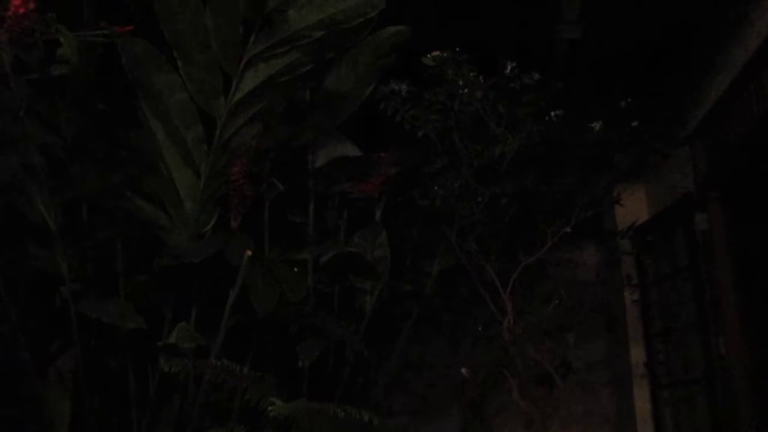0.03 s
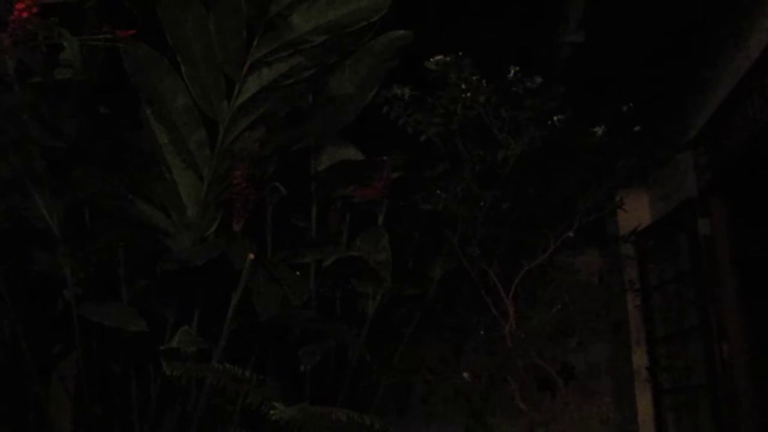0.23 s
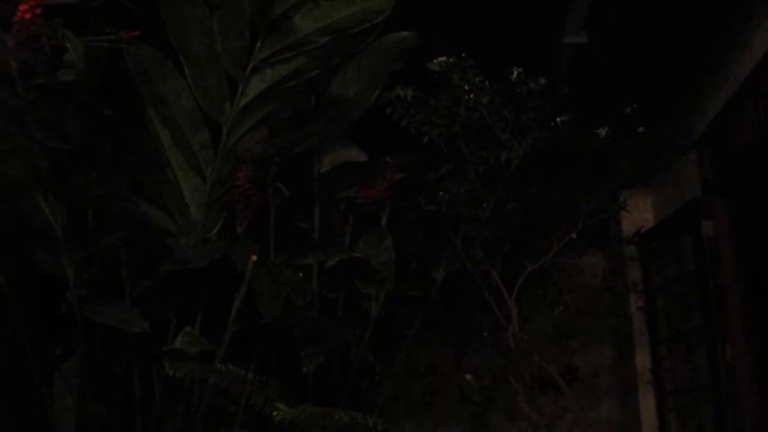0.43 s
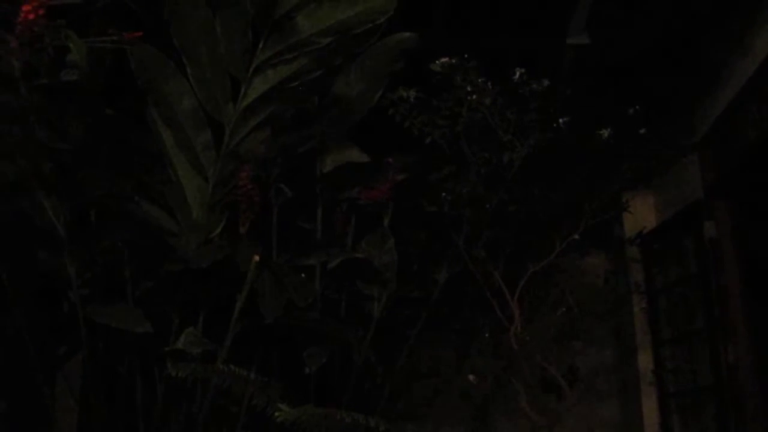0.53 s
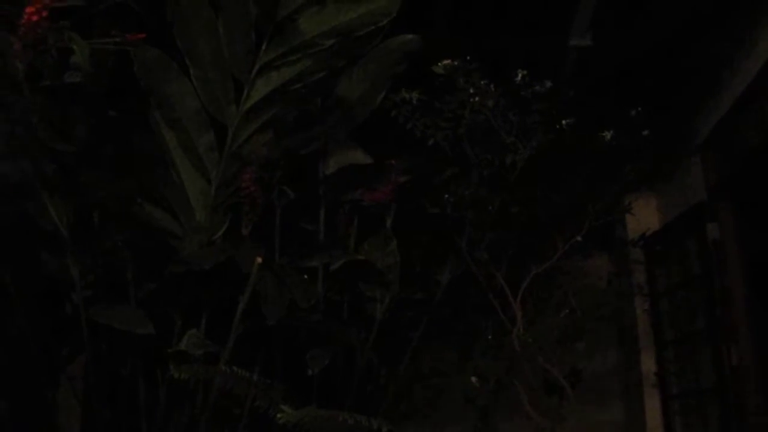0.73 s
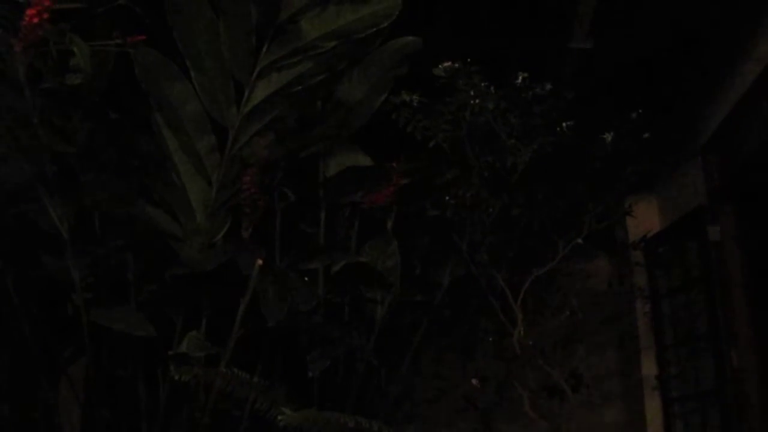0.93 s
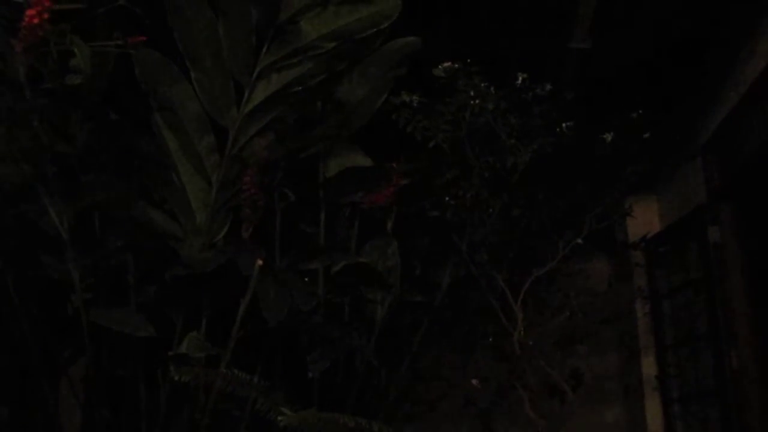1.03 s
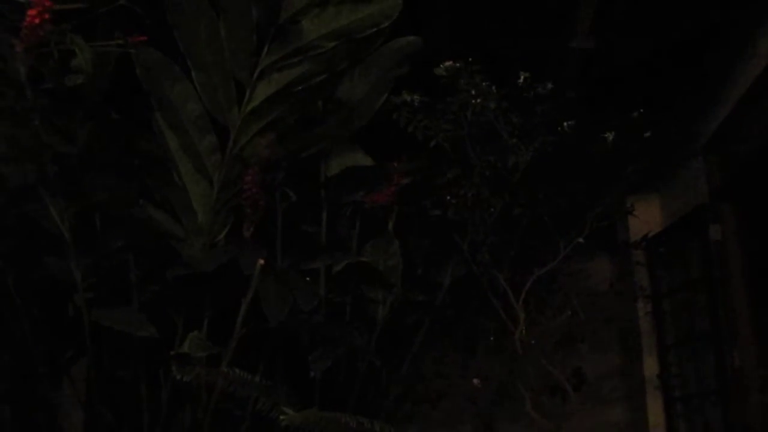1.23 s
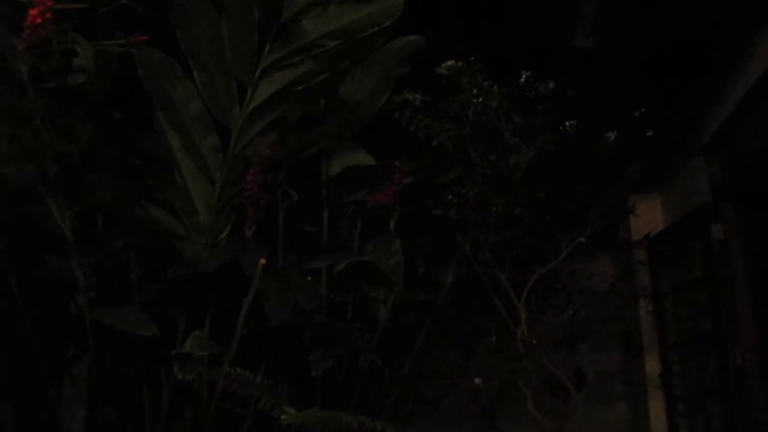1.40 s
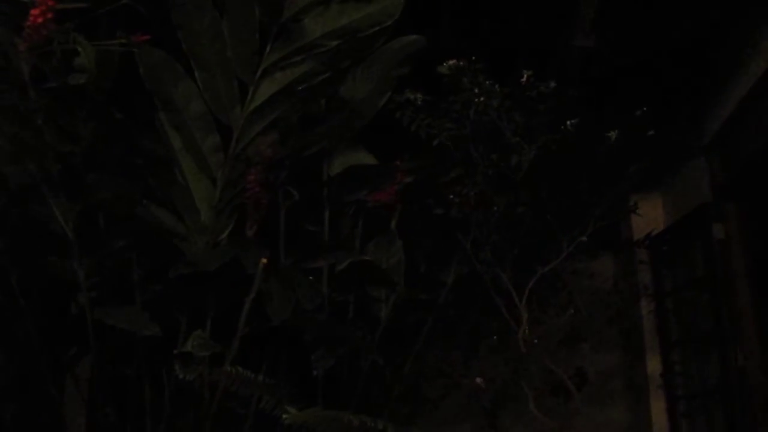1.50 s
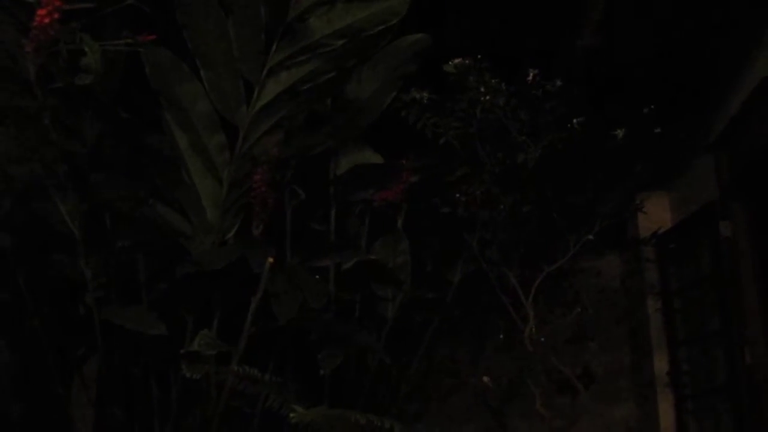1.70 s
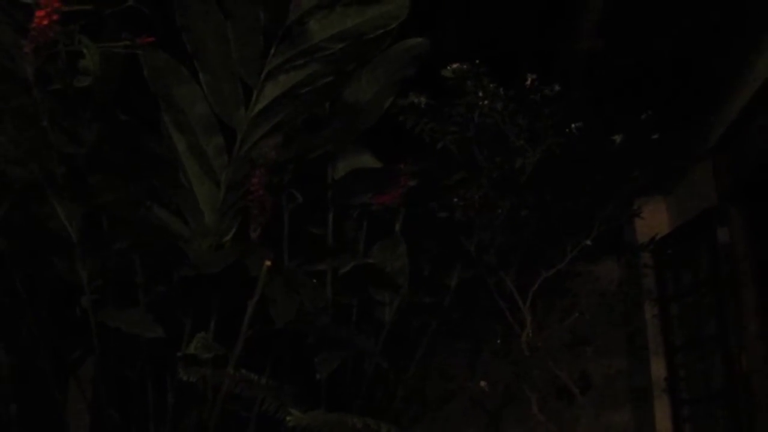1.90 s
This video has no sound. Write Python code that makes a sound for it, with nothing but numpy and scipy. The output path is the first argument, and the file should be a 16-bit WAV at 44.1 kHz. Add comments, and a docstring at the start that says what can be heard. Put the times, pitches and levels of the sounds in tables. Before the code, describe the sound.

A small tree frog close to the microphone calls twice, each time a short low note followed by a louder, higher whistle. The calls echo briefly around a night garden while distant insects hiss and trill steadily.

```python
"""Coqui frog in a night garden

Near the microphone a coqui calls twice: a low "co", then a whistled "qui" that slides up and holds.
Walls and foliage return echoes and a soft tail. Far off, insects hiss and trill over a faint outdoor
rumble, leaves tick, and the recorder's gain control ducks everything during each whistle."""
import sys
import numpy as np
from scipy import signal
from scipy.fft import rfft, irfft
from scipy.io import wavfile
from scipy.ndimage import uniform_filter1d

SR = 44100
rng = np.random.default_rng(int(sys.argv[2]) if len(sys.argv) > 2 else 0)


def inscribe(sig):
    """Save sig as 16-bit PCM at rate SR to the path in sys.argv[1].

    A 1-D sig is mono; a 2-D sig holds one channel per row.
    Samples are clipped to [-1, 1] before scaling.
    """
    pcm = np.round(np.clip(np.atleast_2d(sig).T, -1, 1) * 32767)
    wavfile.write(sys.argv[1], SR, pcm.astype(np.int16))


N = 85995
TIME = np.arange(N) / SR
CO_HZ, CO_S, NOTE_GAP_S = 1885.7, .083, .0022

# The frog, near the microphone:
# (start [s], co level [dB], qui level [dB], qui top pitch [Hz], qui length [s])
CALLS = [(.167, -19.4, -12.8, 3219.5, .211), (1.097, -19.6, -12.8, 3239.2, .173)]
def frog():
    """Each call is a co followed at once by a louder qui."""
    out = np.zeros(N)
    for start, co_db, qui_db, top_hz, length_s in CALLS:
        t = TIME - start
        out += from_db(co_db) * co(t)
        out += from_db(qui_db) * qui(t - CO_S - NOTE_GAP_S, top_hz, length_s)
    return np.sqrt(2) * out


def co(t, attack_s=.061, release_s=.053, end_rise_hz=12, end_s=.012):
    """The low note: a buzzy catch, then a swelling tone whose octave grows as the note strains."""
    hz = CO_HZ + end_rise_hz * ramp((t - CO_S + end_s / 2) / end_s) ** 2
    phase = phase_of(hz * (t > 0))
    catch = from_db(-16) * ramp(t / .002) * ramp(2 * (1 - t / .0067))
    swell = ramp((t - .0089) / attack_s) * ramp(.5 - (t - CO_S) / release_s) ** 2
    buzz = ramp(t / .004) * ramp(1 - t / .033)
    strain = np.clip(t / CO_S, 0, 1) ** 2.8 * ramp(.5 + (CO_S - t) / end_s) ** 2
    octave = from_db(-11.5) * (.41 * buzz + strain) * np.sin(2 * phase)
    fifth_harmonic = from_db(-37) * buzz * np.sin(5 * phase)
    return (catch + swell) * np.sin(phase) + octave + fifth_harmonic


def qui(t, top_hz, length_s, slide_hz=359, slide_s=.0223, waver_hz=.71, attack_s=.07, release_s=.045):
    """The whistle: starts abruptly, slides up to its top pitch while it swells, then fades."""
    hz = top_hz - slide_hz * np.exp(-np.maximum(t, 0) / slide_s) + waver_hz * drift(30)
    phase = phase_of(hz * (t > 0))
    onset = .19 * ramp(t / .0052)
    swell = .81 * ramp(t / attack_s) ** 2
    release = ramp((length_s - t) / release_s)
    tone = np.sin(phase) + from_db(-54.5) * np.sin(3 * phase)
    return (onset + swell) * release * tone


# Echoes off the walls and plants around the microphone: (delay [s], level against the call [dB])
ECHOES = [(0.01185, -8.6), (0.01556, -13.2), (0.0245, -10.4), (0.02622, -10.8), (0.0419, -10.2),
          (0.0446, -10.8), (0.06124, -16.0), (0.08181, -13.1), (0.09668, -15.8), (0.11958, -15.1),
          (0.14131, -18.5), (0.17318, -20.7), (0.20686, -24.9), (0.23124, -28.8), (0.2519, -24.3),
          (0.31025, -33.3)]
def garden(call, tail_db=-26, t60_s=1.29, build_s=.25):
    """Walls and plants return distinct echoes; leaves scatter a diffuse tail."""
    echoes = sum(from_db(db) * np.interp(TIME - delay, TIME, call, left=0) for delay, db in ECHOES)
    scatter = rng.standard_normal(N) * ramp(TIME / build_s) * from_db(-60 * TIME / t60_s)
    scatter /= np.sqrt(np.sum(scatter ** 2))
    return echoes + from_db(tail_db) * signal.fftconvolve(call, scatter)[:N]


# Spectrum of the insect chorus, far off: (frequency [Hz], relative density [dB])
CHORUS_SPECTRUM = [(1600, -30.5), (2100, -4), (2500, -2), (2850, -14.5), (3400, -12), (4300, -14.5),
                   (4750, -2), (5150, 0.5), (5600, -1), (6050, 1), (6350, -10), (6650, -16.5),
                   (7400, -13.5), (8800, -22), (10000, -22.5), (12500, -32), (15600, -39.5)]
# Its slow swell: (time [s], level change [dB])
CHORUS_SWELL = [(0, 1), (.25, 1), (.6, 2), (.9, 0), (1.15, 1.5), (1.5, 1), (1.75, 0.8), (1.95, -0.5)]
def insect_chorus(level_db=-43, flicker_db=.5):
    """Many distant insects merge into a hiss that swells and flickers."""
    swell_db = np.interp(TIME, *np.transpose(CHORUS_SWELL))
    return from_db(level_db + swell_db + flicker_db * drift(40)) * coloured(CHORUS_SPECTRUM)


# Steady crickets and frogs in the distance: (pitch [Hz], width [Hz], level [dB])
STEADY_TRILLS = [(1890, 36, -53), (2160, 7.6, -67), (2190, 4, -69), (2444, 4, -55.5), (2487, 2.2, -54.5),
                 (5023, 60, -51)]
# Brief trills among them: (start [s], length [s], pitch [Hz], width [Hz], level [dB])
BRIEF_TRILLS = [(0.063, .28, 6104, 85, -43), (0.587, 0.276, 3670, 39, -51), (.8, .17, 3670, 12, -58),
                (1.32, .4, 6060, 79, -45), (1.682, 0.27, 6173, 25, -50), (1.758, .25, 5990, 66, -45),
                (1.83, .2, 3640, 8.3, -51)]
def far_callers(attack_s=.031, release_s=.035):
    """Single callers stand out of the chorus, some throughout, some for a moment."""
    out = sum(from_db(db) * trill(hz, width_hz) for hz, width_hz, db in STEADY_TRILLS)
    for start, length_s, hz, width_hz, db in BRIEF_TRILLS:
        envelope = ramp((TIME - start) / attack_s) * ramp((start + length_s - TIME) / release_s)
        out += from_db(db) * envelope * trill(hz, width_hz)
    return out


def trill(hz, width_hz):
    """One far caller: a steady tone blurred by distance into a narrow, fluttering band."""
    phase = 2 * np.pi * hz * TIME
    return rms_one((1 + drift(width_hz)) * np.sin(phase) + drift(width_hz) * np.cos(phase))


# Faint ticks in the garden's foliage: (time [s], level [dB])
LEAF_TICKS = [(0.906, -44), (1.595, -52), (1.688, -37.5)]
# Their spectrum at the microphone: (frequency [Hz], relative density [dB])
TICK_SPECTRUM = [(1500, -4), (3000, 4), (4500, -2), (8500, -2), (12000, -25)]
def leaf_ticks(decay_s=.005):
    """Short puffs of noise from the leaves."""
    envelope = sum(from_db(db) * (TIME > start) * np.exp(-np.abs(TIME - start) / decay_s)
                   for start, db in LEAF_TICKS)
    return envelope * coloured(TICK_SPECTRUM)


# Outdoor ambience all around the microphone: (frequency [Hz], relative density [dB])
AIR_SPECTRUM = [(15, -28.5), (25, -9), (70, -10.5), (92, -5), (125, -8), (223, -4), (429, -7.5), (494, -3),
                (1700, -10), (2210, -49), (3740, -120)]
def night_air(level_db=-48):
    """The faint, steady rumble of the open air."""
    return from_db(level_db) * coloured(AIR_SPECTRUM)


def treble_ticking(per_s=250, level_db=-69, spread_db=4, ring_hz=9600, width_hz=4500):
    """Faint, tiny random clicks, ringing briefly in the high treble."""
    clicks = (rng.random(N) < per_s / SR) * from_db(spread_db * rng.standard_normal(N))
    radius = np.exp(-np.pi * width_hz / SR)
    resonator = [1, 0, -1], [1, -2 * radius * np.cos(2 * np.pi * ring_hz / SR), radius ** 2]
    ringing = signal.lfilter(*resonator, signal.lfilter(*resonator, clicks + 1e-18))
    return from_db(level_db) * rms_one(ringing)


def from_db(db):
    """Decibels to gain."""
    return 10 ** (np.asarray(db) / 20)


def rms_one(x):
    """Scale to rms 1."""
    return x / np.sqrt(np.mean(x ** 2) + 1e-20)


def ramp(u):
    """Quarter-sine rise from 0 to 1."""
    return np.sin(np.pi / 2 * np.clip(u, 0, 1))


def phase_of(hz):
    """Running phase of a changing pitch."""
    return 2 * np.pi * np.cumsum(hz) / SR


def drift(rate_hz):
    """Random wander, mostly slower than rate_hz, rms 1."""
    f = np.arange(N + 1) * SR / (2 * N)
    spectrum = rfft(rng.standard_normal(2 * N)) / (1 + (f / rate_hz) ** 2)
    return rms_one(irfft(spectrum)[:N])


def coloured(points):
    """Noise of rms 1 shaped by (frequency [Hz], level [dB]) points, rolling off beyond them."""
    hz, db = np.transpose(points)
    f = np.arange(N // 2 + 1) * SR / N + 1
    shape = from_db(np.interp(np.log(f), np.log(hz), db))
    rolloff = np.minimum(f / hz[0], 1) ** 2 * np.minimum(hz[-1] / f, 1) ** 10
    return rms_one(irfft(rfft(rng.standard_normal(N)) * shape * rolloff, N))


def scene():
    """One microphone in the garden: the frog in front, insects and night air behind."""
    call = frog()
    mix = call + garden(call) + insect_chorus() + far_callers() + leaf_ticks()
    return (mix + night_air() + treble_ticking())[None]


def record(dry, threshold_db=-19, slope=.63, attack_s=.0055, recover_db_per_s=115.5, cutoff_hz=15700):
    """The recorder's gain control turns loud notes down and recovers quickly; the top treble is cut."""
    level_db = 10 * np.log10(np.maximum(uniform_filter1d(dry[0] ** 2, size=128), 1e-12))
    wanted_cut_db = slope * np.maximum(level_db - threshold_db, 0)
    recovery_db = recover_db_per_s * TIME
    held_cut_db = np.maximum.accumulate(wanted_cut_db + recovery_db) - recovery_db
    pole = np.exp(-1 / (attack_s * SR))
    cut_db = signal.lfilter([1 - pole], [1, -pole], held_cut_db)
    lowpass = signal.ellip(12, .1, 80, cutoff_hz, fs=SR, output="sos")
    return signal.sosfilt(lowpass, dry * from_db(-cut_db))


dry = scene()
out = record(dry)
inscribe(out)
```